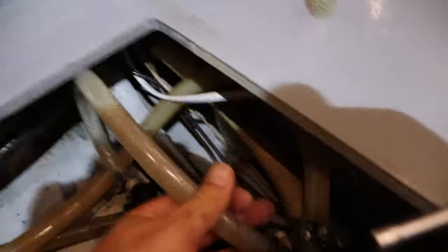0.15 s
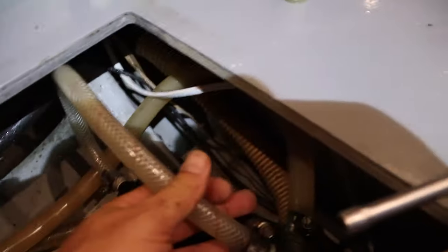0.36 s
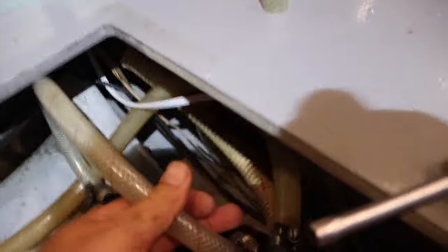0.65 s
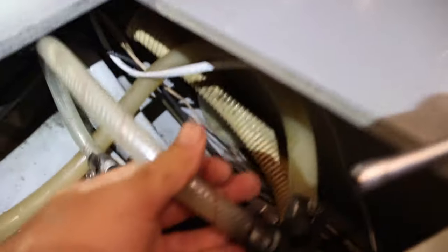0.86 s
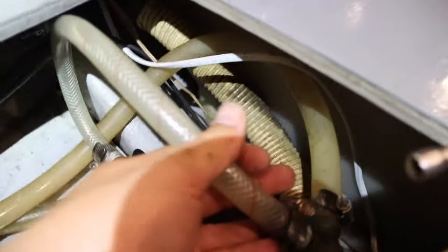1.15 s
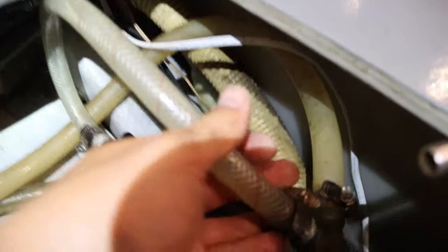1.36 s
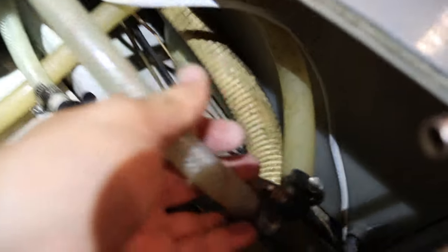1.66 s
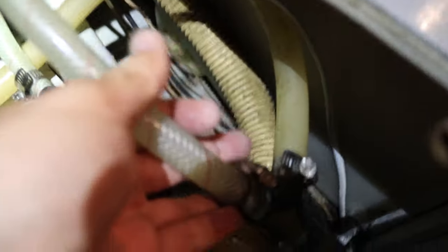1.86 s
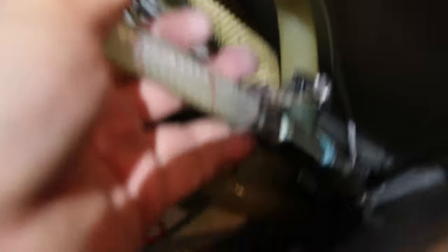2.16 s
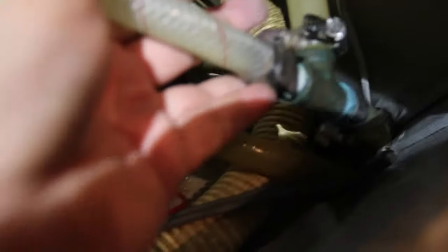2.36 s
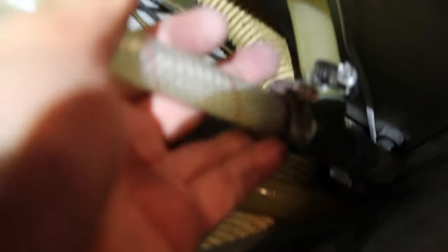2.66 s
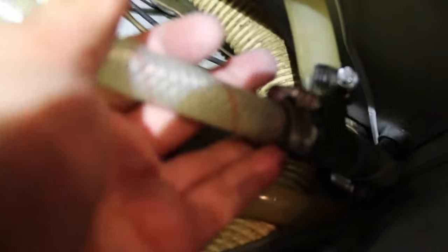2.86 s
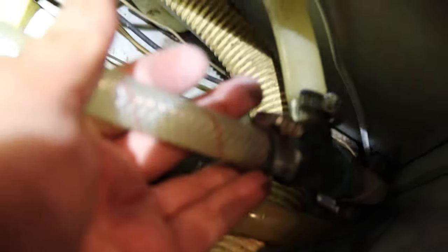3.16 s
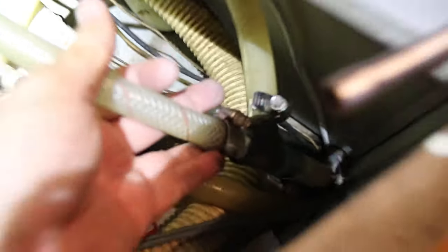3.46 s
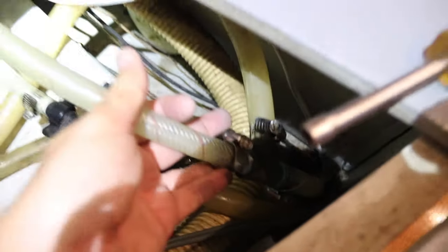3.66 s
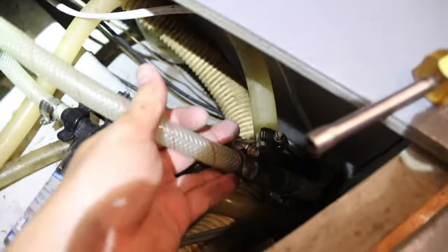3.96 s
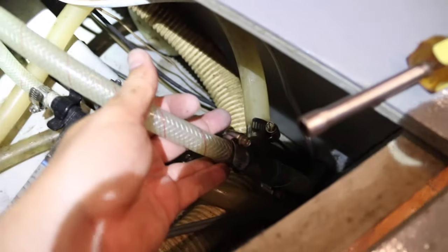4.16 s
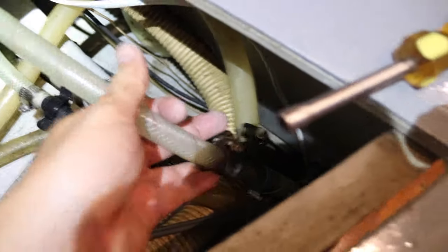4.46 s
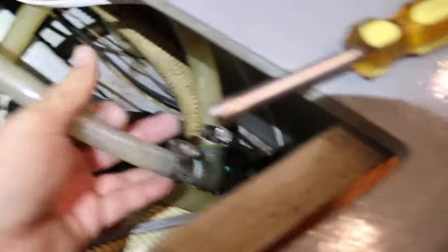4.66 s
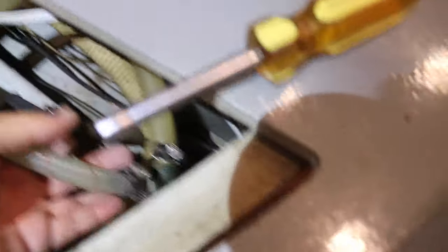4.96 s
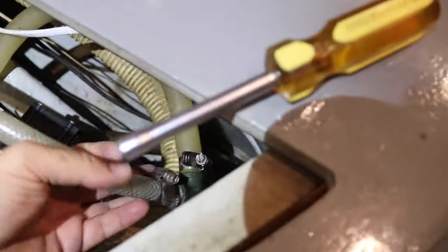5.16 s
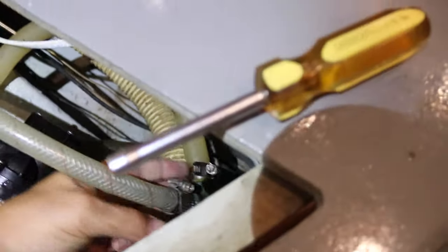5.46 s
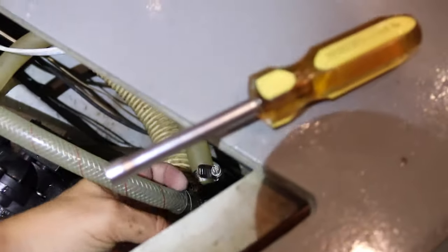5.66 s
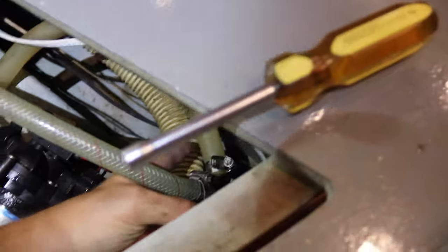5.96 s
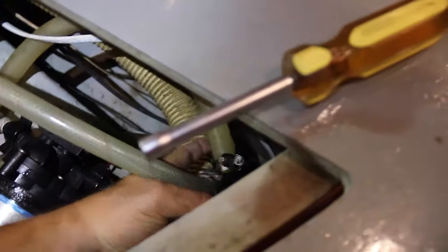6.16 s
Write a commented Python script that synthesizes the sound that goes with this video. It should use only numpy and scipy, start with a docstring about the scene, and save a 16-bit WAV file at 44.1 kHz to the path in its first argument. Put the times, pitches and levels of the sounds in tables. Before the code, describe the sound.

A small electric diaphragm pump runs throughout in a boat's floor hatch, a low steady hum under a dense, rattling buzz of knocks and valve slaps. Water rushes softly in a hose. A sharp click comes at about one second, a soft thump at two, and hand scuffs between. The handheld phone moves close, then draws away, and the buzz grows duller.

```python
"""A hum full of knocks and slaps: a small diaphragm water pump under a boat's cabin floor, near a moving phone.
Motor unbalance shakes the hull into harmonics of the turning speed. Every third turn the pump repeats its
blows, which ring its parts and shift in weight with hose pressure; chamber notes glide and brushes hiss.
Water rushes as shaped noise in the hose; the hand bumps, rubs and scuffs it, and a fitting clicks."""
import sys
import numpy as np
from scipy import signal
from scipy.fft import rfft, irfft, next_fast_len
from scipy.io import wavfile
from scipy.ndimage import uniform_filter1d

SR = 44100
rng = np.random.default_rng(int(sys.argv[2]) if len(sys.argv) > 2 else 0)


def transcribe(signal):
    """Save signal, clipped to [-1, 1], as a 16-bit WAV file at the path in sys.argv[1]."""
    frames = np.atleast_2d(signal).T
    limited = np.clip(frames, -1, 1)
    pcm = np.round(limited * 32767).astype(np.int16)
    wavfile.write(sys.argv[1], SR, pcm)


N = 278830
T = np.arange(N) / SR  # time in seconds


def undb(db):
    """Amplitude law: 20 dB is a tenfold gain."""
    return 10 ** (np.asarray(db) / 20)


def curves(table):
    """Linear interpolation: each column of rows (s, ..) at every sample."""
    s, *columns = np.transpose(table)
    return [np.interp(T, s, column) for column in columns]


def swells(rows):
    """Gaussian envelope: a smooth hump for each (s, half length s, height)."""
    return sum(height * np.exp(-((T - s) / half_s) ** 2) for s, half_s, height in rows)


def walk(rate):
    """Smoothed noise: a slow random wander with a spread near 1; a higher rate in Hz is faster."""
    k = int(SR / rate)
    steps = np.repeat(rng.standard_normal(N // k + 1), k)
    return 1.3 * uniform_filter1d(uniform_filter1d(steps, k), k)[:N]


def filtered(x, response):
    """Linear filtering: multiply the spectrum by a response given as a function of Hz."""
    size = next_fast_len(N + 8192)
    hz = np.maximum(np.arange(size // 2 + 1) * SR / size, 1)
    return irfft(rfft(x, size) * response(hz), size)[..., :N]


def colour(x, points):
    """Spectral shaping: a smooth response through (Hz, dB) points on a log frequency axis."""
    hz, db = np.transpose(points)
    return filtered(x, lambda f: undb(np.interp(np.log(f), np.log(hz), db)))


def ring(x, modes):
    """Modal resonance: parallel modes (Hz, width Hz, dB) of alternating sign, with skirts outside their range."""
    edges = [.8 * modes[0][0], 1.25 * modes[-1][0]]
    x = signal.sosfilt(signal.butter(2, edges, "band", fs=SR, output="sos"), x)
    out = 0
    for k, (hz, width, db) in enumerate(modes):
        mode = signal.lfilter(*signal.iirpeak(hz, hz / width, fs=SR), x)
        out = out + (-1) ** k * undb(db) * mode
    return out


def pair(shape, apart):
    """Partial coherence: noise for two ports; apart 0 is the same in both, 1 unrelated."""
    apart = np.clip(apart, 0, 1)
    common = rng.standard_normal(shape)
    separate = rng.standard_normal((2, *shape))
    return np.sqrt(1 - apart) * common + np.sqrt(apart) * separate


PORT_LAG_S = 0.00015  # the left port hears the pump first


def ports(x, left_db, lag_s=PORT_LAG_S):
    """Arrival differences: the right port lags the left, which is left_db stronger."""
    late = filtered(x[-1], lambda f: np.exp(-2j * np.pi * f * lag_s))
    return np.array([x[0] * undb(left_db / 2), late * undb(-left_db / 2)])


def level(x, db):
    """Running mean square: hold the mean of the two ports at a level over 0.3 s."""
    power = uniform_filter1d(x.mean(0) ** 2, size=13230)
    return x * undb(db) / np.sqrt(power + 1e-18)


def bursts(rows, t60, apart):
    """Exponential decay: a noise burst for each (s, dB), falling 60 dB in t60 seconds."""
    envelope = sum(undb(db) * (T >= s) * undb(-60 * np.clip(T - s, 0, 1) / t60) for s, db in rows)
    return envelope * pair((N,), apart)


# Motor speed. Each row: time in seconds, turns a second in Hz.
MOTOR_SPEED = [(0.0, 60.77), (0.61, 59.62), (1.04, 60.28), (1.06, 59.53), (2.49, 60.24), (3.02, 59.8),
               (3.26, 61.76), (4.05, 60.84), (4.22, 60.07), (4.61, 59.74), (4.82, 58.66), (5.05, 59.04),
               (6.32, 59.07)]
TURNS_PER_CYCLE = 3


def motor_cycle():
    """Phase is the integral of speed: pump cycles elapsed at every sample."""
    return np.cumsum(curves(MOTOR_SPEED)[0]) / SR / TURNS_PER_CYCLE


# Back pressure in the hose. Each row: time in seconds, pressure from 0 to 1.
HOSE_PRESSURE = [(0, 0.14), (1.6, 0.18), (2.4, 0.24), (3.05, 0.36), (3.18, 0.46), (3.55, .6), (4.0, 0.9),
                 (6.32, 0.46)]


def hose_pressure():
    """Load on the pump: back pressure against time, 0-1."""
    return np.clip(curves(HOSE_PRESSURE)[0], 0, 1)


# Hose pressures (0-1) at which the pump runs slack, primed and pressurised, in that order.
LOAD_STAGES = (.145, .22, .7)


def under_load(stage_db, pressure):
    """Load dependence: blend slack, primed and pressurised levels by the hose pressure."""
    return np.interp(pressure, LOAD_STAGES, stage_db)


# How firmly the valves seat. Each row: back pressure from 0 to 1, seating from 0 to 1.
VALVE_SEATING = [(.12, 0), (.2, .6), (.32, .9), (.7, 1)]


def valve_seating(pressure):
    """Check valve action: back pressure presses the valves onto their seats."""
    return np.interp(pressure, *np.transpose(VALVE_SEATING))


# Spectrum of the rushing water. Each row: frequency in Hz, relative level in dB.
WATER_SPECTRUM = [(25, -13), (40, -17), (60, -3.5), (130, 5), (250, -1), (480, -4.5), (800, -7.5),
                  (1500, -7), (3000, -3), (5000, -37), (9000, -57)]
# Surges of the flow. Each row: centre in seconds, half length in seconds, rise in dB.
FLOW_SURGES = [(.08, 0.35, 5), (.55, 0.078, 2.2), (1.35, 0.47, 4.9), (3.4, 0.28, 7.3)]
WATER_DB, WATER_SEATED_DB = -38.5, -3  # base level; change once the valves are seated


def water(cycle, seated, pulse_db=3.0, pulse_place=0.77):
    """Turbulent flow noise: water in the hose, pushed along at every turn, slackens as the valves seat."""
    rush = colour(pair((N,), apart=0.2), WATER_SPECTRUM) * undb(1.5 * walk(20))
    rush = rush * undb(pulse_db * np.cos(2 * np.pi * TURNS_PER_CYCLE * (cycle - pulse_place)))
    return level(ports(rush, left_db=2.0), WATER_DB + WATER_SEATED_DB * seated + swells(FLOW_SURGES))


# The hand rubs along the hose. Each row: centre in seconds, half length in seconds, level in dB.
HOSE_RUBS = [(1.3, 0.57, -56), (5.548, 0.32, -49.5), (6.213, 0.28, -52.5)]
# Spectrum of the rubbing. Each row: frequency in Hz, relative level in dB.
RUB_SPECTRUM = [(1000, 2), (3800, -2), (5100, 4.5), (6300, -1), (12000, -5), (15700, -17)]


def rubbing(patchy_db=0.5):
    """Friction noise: skin rustles unevenly on the braided hose."""
    hiss = level(colour(pair((N,), apart=0.93), RUB_SPECTRUM), 0) * undb(patchy_db * walk(25))
    return hiss * swells([(s, half_s, undb(db)) for s, half_s, db in HOSE_RUBS])


# Finger scuffs. Each row: centre in seconds, half length in seconds, relative level in dB, centre pitch in Hz.
FINGER_SCUFFS = [(0.097, 0.06, -34.5, 440), (1.12, 0.044, -36, 1700), (1.185, 0.075, -37, 630),
                 (1.287, 0.024, -41, 640), (1.58, 0.093, -37, 654), (2.223, 0.046, -40, 1850),
                 (3.464, .035, -34, 1900), (5.368, 0.054, -40, 553), (5.514, 0.057, -43, 540)]
SCUFF_SPREAD = 1.4  # ratio of each band edge to the centre


def scuffs(grain_db=4):
    """Stick-slip friction: fingers catch on the braid in short, grainy scuffs of band noise."""
    out = 0
    for s, half_s, db, hz in FINGER_SCUFFS:
        grains = pair((N,), apart=.3) * undb(grain_db * walk(300))
        edges = [hz / SCUFF_SPREAD, hz * SCUFF_SPREAD]
        body = signal.sosfilt(signal.butter(2, edges, "band", fs=SR, output="sos"), grains)
        out = out + body / body.std() * swells([(s, half_s, undb(db))])
    return ports(out, left_db=-3.5)


# The hand bumps the hose. Each row: start in seconds, relative level in dB, pitch in Hz.
HOSE_BUMPS = [(0.07, -33, 261), (0.531, -42, 342), (2.052, -23.5, 192), (4.66, -35, 76.5),
              (4.851, -28, 124.5), (5.7, -47, 109.6), (5.908, -38, 110), (6.151, -42, 105),
              (6.211, -33, 105)]


def bumps(peak_s=0.022):
    """Damped impact: each soft bump is a sine that swells to its peak and dies away."""
    out = 0
    for s, db, hz in HOSE_BUMPS:
        age = np.clip(T - s, 0, 1)
        envelope = age / peak_s * np.exp(1 - age / peak_s)
        out = out + undb(db) * envelope * np.sin(2 * np.pi * hz * age)
    return undb(-1) * out


# Faint creaks of the hose. Each row: start in seconds, relative level in dB.
HOSE_CREAKS = [(2.939, -48), (2.982, -47), (3.23, -50), (3.3105, -41.5), (4.468, -50), (5.705, -51),
               (5.94, -50)]
# Spectrum of a creak. Each row: frequency in Hz, relative level in dB.
CREAK_SPECTRUM = [(2500, -29), (3800, 17.5), (5000, 6), (9000, 9), (15000, -4)]


def creaks():
    """Strain release: the held hose creaks in brief decaying noise."""
    return undb(6) * colour(bursts(HOSE_CREAKS, t60=0.047, apart=0.49), CREAK_SPECTRUM)


# Clicks of the hose fitting. Each row: start in seconds, relative level in dB.
FITTING_CLICKS = [(.9762, -16), (2.22, -33), (3.469, -29)]
# Resonances of the fitting. Each row: frequency in Hz, width in Hz, relative level in dB.
FITTING_MODES = [(1350, 300, -4), (1809, 300, 6), (2514, 650, 0), (3400, 350, -1), (3830, 400, 2),
                 (4400, 450, -5), (6800, 3500, -14)]
# Crack of the contact itself. Each row: frequency in Hz, relative level in dB.
CRACK_SPECTRUM = [(600, -22), (1400, 1), (4300, 1), (5500, -5), (9500, -11), (15000, -30)]


def clicks():
    """Impulse response: a snap and a short scrape ring the fitting, under the crack of contact."""
    snap = sum(undb(db) * (np.arange(N) == int(s * SR)) for s, db in FITTING_CLICKS)
    contact = undb(15.5) * snap + undb(-7) * bursts(FITTING_CLICKS, t60=.028, apart=.4)
    crack = colour(bursts(FITTING_CLICKS, t60=.013, apart=.4), CRACK_SPECTRUM)
    return undb(3.5) * crack + undb(9) * ring(contact, FITTING_MODES)


def handling():
    """Superposition: bumps, creaks and clicks of the held hose reach both ports almost together."""
    return ports(bumps() + creaks() + clicks(), left_db=1.5, lag_s=.00005)


# The phone leans in to the pump and draws back. Each row: time in seconds, distance in m.
PHONE_DISTANCE = [(0, 0.63), (.8, 0.53), (1.5, 0.37), (2.5, 0.33), (3.5, 0.32), (3.9, 0.45), (4.5, 0.48),
                  (5.3, 0.59), (5.75, 0.74), (6.32, 0.86)]
REFERENCE_M = .3


def heard(source, pressure):
    """Distance law: a part's level falls per doubling of distance and changes with load."""
    db, doubling_db, pressure_db = source
    doublings = np.log2(curves(PHONE_DISTANCE)[0] / REFERENCE_M)
    return db + doubling_db * doublings + pressure_db * pressure


# the rim of the hatch hides the valves and chamber notes, with full effect from SCREEN_HZ up
SCREEN_FROM_S, SCREEN_OVER_S, SCREEN_DB, SCREEN_HZ = 4.4, 0.87, -13, 2500


def screened():
    """Acoustic shadow: how far the hatch rim hides the pump, 0-1."""
    return np.clip((T - SCREEN_FROM_S) / SCREEN_OVER_S, 0, 1)


# a sharp resonance makes any of these tones that glides into it sing
SING_HZ, SING_HALF_WIDTH_HZ, SING_DB = 718, 9, 6.5


def tones(table, cycle, pressure, place, spread_rad, waver_db=1.5, waver_rad=0.24):
    """Fourier series: multiples of the pump cycle bunch up around one stroke and waver a little."""
    out = 0
    for multiple, *stage_db in table:
        hz = multiple * np.gradient(cycle) * SR
        sing_db = SING_DB / (1 + ((hz - SING_HZ) / SING_HALF_WIDTH_HZ) ** 2)
        db = under_load(stage_db, pressure) + sing_db + waver_db * walk(3.02)
        smear = spread_rad * rng.standard_normal() + waver_rad * walk(3.67)
        out = out + undb(db) * np.cos(2 * np.pi * round(multiple) * (cycle - place) + smear)
    return np.sqrt(2) * out


# Hull hum at the motor speed. Each row: time in seconds, relative level in dB.
HUM_FIRST = [(0.0, -31.5), (1.44, -32.5), (1.6, -38), (1.88, -29), (2.52, -31.5), (3.44, -28),
             (4.48, -33.5), (4.64, -36), (4.88, -41), (6.32, -38)]
# Hull hum at twice the motor speed; the phone passes a node of it early on.
# Each row: time in seconds, relative level in dB.
HUM_SECOND = [(0.0, -31), (0.16, -47), (0.48, -47), (0.68, -31.5), (1.2, -32.5), (1.56, -22.5),
              (1.92, -24.5), (2.4, -22.5), (2.48, -17.5), (3.96, -24.5), (4.6, -24.5), (5.68, -28.5),
              (6.12, -22), (6.2, -29.5), (6.32, -23.5)]
# Hull hum at three times the motor speed. The row: level at 0.3 m in dB, change in dB per doubling of
# distance, dB added by full pressure.
HUM_THIRD = (-26.5, -7, 6.06)
# Hull hum at four times the motor speed. Each row: time in seconds, relative level in dB.
HUM_FOURTH_LEVEL = [(0, -39), (.7, -45), (1.5, -35), (1.7, -39), (2.1, -33), (2.65, -38.5), (2.95, -34.5),
                    (3.5, -47), (4.5, -37.5), (5.0, -42.5), (6.32, -44.5)]
# Weaker hum tones. Each row: multiple of the pump cycle, slack dB, primed dB, pressurised dB.
HUM_OVERTONES = [(5, -46, -42, -48), (7, -39.5, -39.5, -41), (8, -37, -37.5, -37.5), (10, -41, -42, -40.5),
                 (11, -44, -53, -54), (13, -41.5, -43.5, -49), (15, -45, -43.5, -43.5), (16, -52, -49, -58),
                 (17, -50, -54, -57)]


def hull(cycle, pressure, lead=0.16, fourth_rad=np.pi, waver_db=2.1):
    """Forced vibration: unbalance pushes the hull once a turn; its hum wavers as the phone draws back."""
    turn = 2 * np.pi * (TURNS_PER_CYCLE * cycle + lead)
    levels = curves(HUM_FIRST) + curves(HUM_SECOND) + [heard(HUM_THIRD, pressure)]
    hum = 0
    for k, db in enumerate(levels):
        wavering_db = db + waver_db * screened() * walk(18)
        hum = hum + undb(wavering_db) * np.cos((k + 1) * turn)
    # the fourth harmonic is opposite in sign
    hum = hum + undb(curves(HUM_FOURTH_LEVEL)[0]) * np.cos(4 * turn + fourth_rad)
    return np.sqrt(2) * hum + tones(HUM_OVERTONES, cycle, pressure, place=.128, spread_rad=.25)


# Steady tones of the floor panel. Each row: multiple of the pump cycle, then slack dB, primed dB and
# pressurised dB relative to the panel.
PANEL_HARMONICS = [(18, -11, -16, -14), (19, -8, -11, -13), (20, -13, -14, -12), (21, -7, -1, -9.5),
                   (22, -10, -8, -14), (24, -9, -21, -14), (26, -12, -27, -22), (27, -15, -13, -21),
                   (28, -9, -12, -17), (31, -23, -18, -19), (32, -12, -13, -23)]
# The panel as heard. The row: level at 0.3 m in dB, dB per doubling of distance, dB added by full pressure.
PANEL_LEVEL = (-34, -6, 0)


def floor_panel(cycle, pressure):
    """Forced vibration: the floor panel sounds at multiples of the pump cycle."""
    drone = tones(PANEL_HARMONICS, cycle, pressure, place=.93, spread_rad=1.44)
    return undb(heard(PANEL_LEVEL, pressure)) * drone


# Steady tones of the housing. Each row: multiple of the pump cycle, then slack dB, primed dB and
# pressurised dB relative to the housing.
HOUSING_HARMONICS = [(33, -7, -20, -20), (34, -22, -21, -17), (35, -7, -9, -7.5), (36, -18, -28, -13),
                     (37, -17, -15, -10), (38, -18, -18, -11), (39, -4, -5, -11), (40, -8, -2, -11),
                     (41, -13, -10, -12), (42, -13, -30, -14), (43, -11, -28, -14), (46, -14, -17, -19),
                     (52, -12, -11, -18), (53, -15, -15, -19), (57, -13, -15, -19)]
# The whine as heard. The row: level at 0.3 m in dB, dB per doubling of distance, dB added by full pressure.
WHINE_LEVEL = (-33.7, -5, 0)


def housing_whine(cycle, pressure):
    """Forced vibration: the housing whines at higher multiples of the pump cycle."""
    whine = tones(HOUSING_HARMONICS, cycle, pressure, place=.76, spread_rad=0.77)
    return undb(heard(WHINE_LEVEL, pressure)) * whine


# Spectrum of the brushes. Each row: frequency in Hz, left relative level in dB, right relative level in dB.
BRUSH_SPECTRUM = [(1970, 8, 1), (3150, 9, 21), (4300, 7.5, 9.5), (5200, 10, 3), (5280, 3, 9), (6660, 1, -6),
                  (7540, 0.5, 5.5), (8340, 4.5, 3), (8260, 0, 1), (10700, -1.5, -2), (13100, -6, 1.5),
                  (14500, -10.5, -6), (15700, -17, -19)]
# The hiss as heard. The row: level at 0.3 m in dB, dB per doubling of distance, dB added by full pressure.
BRUSH_LEVEL = (-42.5, -4, 0.17)


def brushes(cycle, pressure, echo_db=-8, size=400):
    """Friction noise: brushes scrape harder on one side of each turn; near walls comb the hiss."""
    turn = 2 * np.pi * TURNS_PER_CYCLE * cycle
    scrape_db = 0.61 * np.cos(turn) + 1.32 * walk(200) + 0.15 * walk(3.7)
    scrape = pair((N,), apart=0.95) * undb(scrape_db)
    walls = undb(echo_db) * pair((size,), apart=0.66) / np.sqrt(size)
    walls[:, 0] += 1  # the direct sound
    scrape = signal.fftconvolve(scrape, walls, axes=1)[:, :N]
    hz, left, right = np.transpose(BRUSH_SPECTRUM)
    hiss = [colour(x, np.c_[hz, port_db]) for x, port_db in zip(scrape, (left, right))]
    return level(ports(hiss, left_db=7.0), heard(BRUSH_LEVEL, pressure))


# Gliding notes of the pump chambers. Each row: place in the cycle from 0 to 1, half length in seconds,
# pitch in Hz, glide in Hz per second, then slack, primed and pressurised relative levels in dB.
CHAMBER_GLIDES = [(.13, .007, 850, 4000, -16, -15, -7), (.22, .004, 1120, 10000, -9, -7, -12),
                  (.32, .003, 3150, 30000, -28, -4, -11), (.53, .005, 1080, 35000, -14, -7, -14),
                  (.67, .003, 3090, 0, -26, -6, -5), (.68, .003, 1385, 10000, -9, -1, 2),
                  (.8, .005, 1340, -11000, 0, -4, -16), (.98, .004, 3040, -20000, -24, -6, -6)]
# The chambers as heard. The row: level at 0.3 m in dB, dB per doubling of distance, dB added by full pressure.
CHAMBER_LEVEL = (-31, -4.5, 0)


def chambers(cycle, pressure, waver_db=1.14, waver_rad=0.12):
    """Cavity resonance: each note swells once a cycle; its pitch glides as the diaphragm moves."""
    out, cycle_s = 0, TURNS_PER_CYCLE / curves(MOTOR_SPEED)[0]
    for place, half_s, hz, glide, *stage_db in CHAMBER_GLIDES:
        age = ((cycle - place + .5) % 1 - .5) * cycle_s  # seconds from the centre of the note
        shadow_db = SCREEN_DB * screened() * min(hz / SCREEN_HZ, 1)
        db = under_load(stage_db, pressure) + waver_db * walk(20) + shadow_db
        angle = 2 * np.pi * (hz * age + glide * age ** 2 / 2) + waver_rad * walk(18) + walk(0.98)
        out = out + undb(db) * np.exp(-(age / half_s) ** 2) * np.cos(angle)
    return np.sqrt(2) * out * undb(heard(CHAMBER_LEVEL, pressure))


def strikes(cycle, pressure, blows, echo_db, loose, apart, uneven_db, t60=.03, drift=0.022, size=2048):
    """Periodic impact: each blow recurs once a cycle with drifting bilge echoes; loose parts rattle afresh."""
    out, count = np.zeros((2, N + 4 * size)), int(cycle[-1]) + 1
    fade = undb(-60 * np.arange(size) / SR / t60)
    fade *= undb(echo_db) / np.linalg.norm(fade)
    loose = np.clip(loose, 0, 1)
    angle = drift * np.arange(count)[:, None]  # radians by which the echoes have drifted
    for place, *stage_db in blows:
        at = np.interp(np.arange(count) + place, cycle, np.arange(N), right=N)
        echoes = np.cos(angle) * pair((1, size), apart) + np.sin(angle) * pair((1, size), apart)
        rattle = pair((count, size), apart)
        hit = fade * (np.sqrt(1 - loose) * echoes + np.sqrt(loose) * rattle)
        hit[..., 0] += 1  # the direct sound
        # a phase ramp places each blow between samples
        ramp = np.exp(-2j * np.pi * np.outer(at % 1, np.arange(size // 2 + 1)) / size)
        hit = irfft(rfft(hit) * ramp)
        db = under_load(stage_db, np.interp(at, np.arange(N), pressure))
        db = db + uneven_db * rng.standard_normal(count)
        for k, i in enumerate(at.astype(int)):
            out[:, i:i + size] += undb(db[k]) * hit[:, k]
    return out[:, :N]


def part(force, modes, pressure, db, left_db, lag_s=PORT_LAG_S):
    """Modal excitation: a part rings under its blows; pressure shifts the weight between its modes."""
    loaded = [(hz, width, under_load(stage_db, pressure)) for hz, width, *stage_db in modes]
    return level(ports(ring(force, loaded), left_db, lag_s), db)


# Blows on the housing. Each row: place in the cycle from 0 to 1, then slack, primed and pressurised
# relative levels in dB.
KNOCK_BLOWS = [(.12, 2, 3, 0), (.42, -2, 0, -4), (.69, -5, -2, 2), (.81, 4, 0, -3), (.95, -3, -3, -4)]
# Housing resonances. Each row: frequency in Hz, width in Hz, slack dB, primed dB, pressurised dB.
HOUSING_MODES = [(724, 32, -3, 0, -3), (753, 114, -4, -0.5, 8), (883, 170, -5, -16, -4)]
# The knocks as heard. The row: level at 0.3 m in dB, dB per doubling of distance, dB added by full pressure.
KNOCK_LEVEL = (-44, -5, -1)


def housing_knocks(cycle, pressure):
    """Impact and resonance: blows knock the housing into its low modes."""
    knocks = strikes(cycle, pressure, KNOCK_BLOWS, echo_db=-2, loose=.04, apart=.6, uneven_db=1.2)
    return part(knocks, HOUSING_MODES, pressure, heard(KNOCK_LEVEL, pressure), left_db=6.0)


# Blows on the pump head. Each row: place in the cycle from 0 to 1, then slack, primed and pressurised
# relative levels in dB.
CLATTER_BLOWS = [(.04, -9, -4, -1), (.14, -5, -6, -6), (.295, -8, -1, -4), (.46, 2, -1, -6),
                 (.545, -4, -4, -12), (.645, -9, -3, 1), (.80, 2, -5, -3), (.955, -1, 2, 2)]
# Head resonances. Each row: frequency in Hz, width in Hz, slack dB, primed dB, pressurised dB.
HEAD_MODES = [(1029, 96, 2.5, 3.5, 0), (1208, 110, -4, 1.5, -5), (1305, 113, 0, 4, -0.5),
              (1683, 240, -6, -3.5, -4.5), (1925, 140, -6, 3.5, 1), (2226, 81, 0, -1, 3)]
# The clatter as heard. The row: level at 0.3 m in dB, dB per doubling of distance, dB added by full pressure.
CLATTER_LEVEL = (-37.5, -6, 1)


def head_clatter(cycle, pressure):
    """Impact and resonance: blows clatter in the middle modes of the pump head."""
    clatter = strikes(cycle, pressure, CLATTER_BLOWS, echo_db=-1, loose=.12, apart=.85, uneven_db=1.2)
    return part(clatter, HEAD_MODES, pressure, heard(CLATTER_LEVEL, pressure), left_db=3.0)


# Blows of the valves. Each row: place in the cycle from 0 to 1, then slack, primed and pressurised
# relative levels in dB.
SLAP_BLOWS = [(.125, -7, -5, -12), (.3, -15, -1, -4), (.47, 1.5, .5, -10), (.545, -6, -6, -13),
              (.645, -12, -2, 2.5), (.805, 3.5, -4, -4), (.955, -6, -1, -1.5)]
# Valve resonances. Each row: frequency in Hz, width in Hz, slack dB, primed dB, pressurised dB.
VALVE_MODES = [(2460, 360, 4.5, -0.5, -6.5), (3006, 125, 3.5, 2.5, 4), (3197, 103, 4, 4, 0.5),
               (3600, 440, 4, -2.5, -11.5), (4280, 110, 0, -6.5, -11), (5120, 190, -10, -10, -17)]
# The slaps as heard. The row: level at 0.3 m in dB, dB per doubling of distance, dB added by full pressure.
SLAP_LEVEL = (-39, 0.68, -2.1)
DRY_SLAP_DB, DRY_SLAP_S = 3, 0.38  # extra level at first, and its decay time, before water cushions the valves


def valve_slaps(cycle, pressure):
    """Impact and resonance: valves slap in their high modes, behind the hatch rim once it hides them."""
    slaps = strikes(cycle, pressure, SLAP_BLOWS, echo_db=-2.5, loose=.1, apart=.9, uneven_db=1.1)
    dry_db = DRY_SLAP_DB * np.exp(-T / DRY_SLAP_S)
    db = heard(SLAP_LEVEL, pressure) + SCREEN_DB * screened() + dry_db
    return part(slaps, VALVE_MODES, pressure, db, left_db=0.7, lag_s=0.00009)


def pump(cycle, pressure):
    """Superposition of synchronous sources: drone, blows, notes and hiss all follow the motor."""
    drone = hull(cycle, pressure) + floor_panel(cycle, pressure) + housing_whine(cycle, pressure)
    blows = housing_knocks(cycle, pressure) + head_clatter(cycle, pressure) + valve_slaps(cycle, pressure)
    notes = ports([chambers(cycle, pressure)], left_db=5.5)
    return ports([drone], left_db=2.5) + blows + notes + brushes(cycle, pressure)


def scene():
    """Superposition: the water, the hand on the hose and the pump sound together."""
    cycle = motor_cycle()
    pressure = hose_pressure()
    hand = rubbing() + scuffs() + handling()
    return water(cycle, valve_seating(pressure)) + hand + pump(cycle, pressure)


TOP_HZ = 15750


def record(dry):
    """Band limiting: the phone cuts the top with a steep low-pass."""
    return signal.sosfilt(signal.ellip(10, .2, 80, TOP_HZ, fs=SR, output="sos"), dry)


dry = scene()
out = record(dry)
transcribe(out)
```